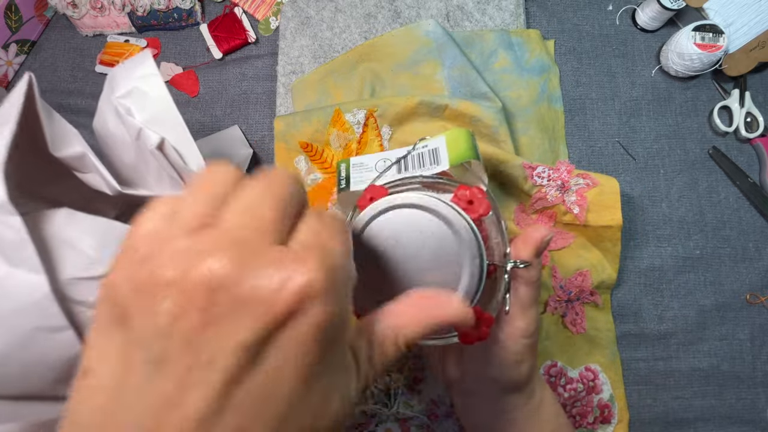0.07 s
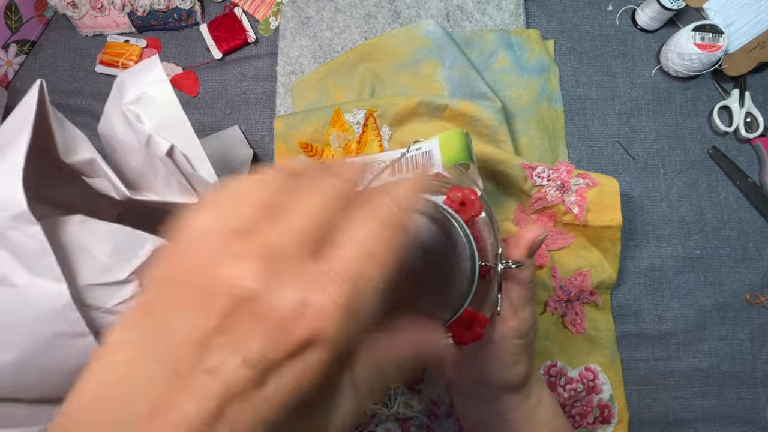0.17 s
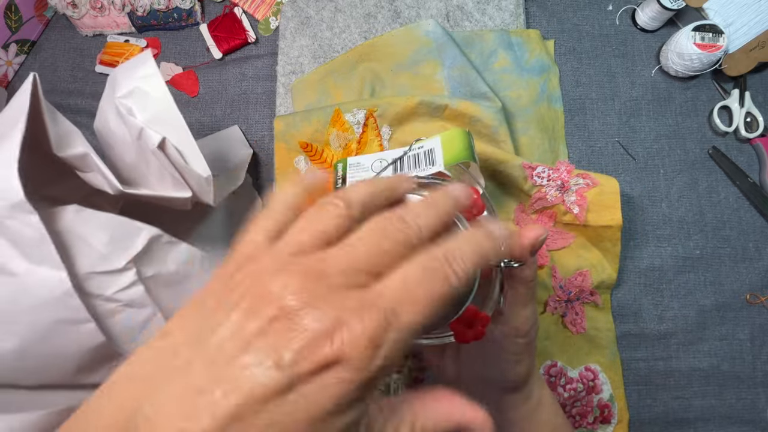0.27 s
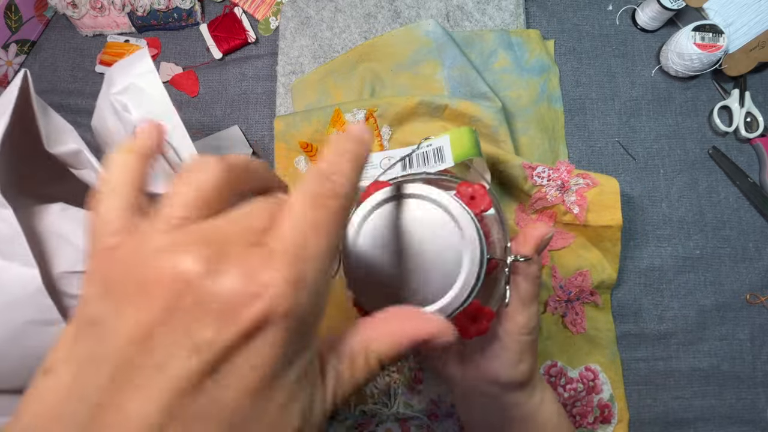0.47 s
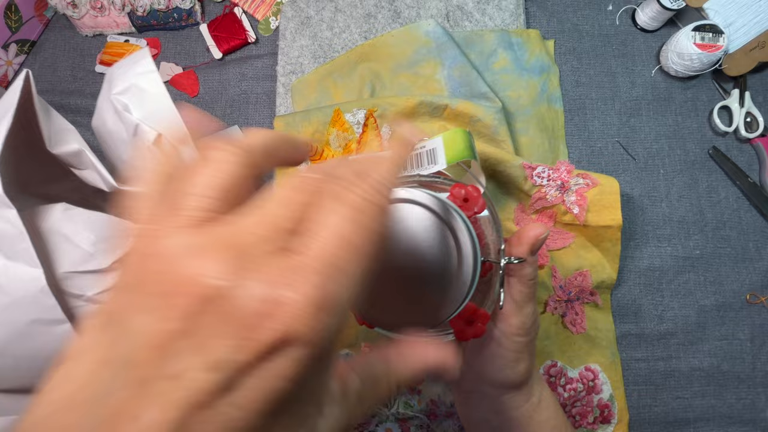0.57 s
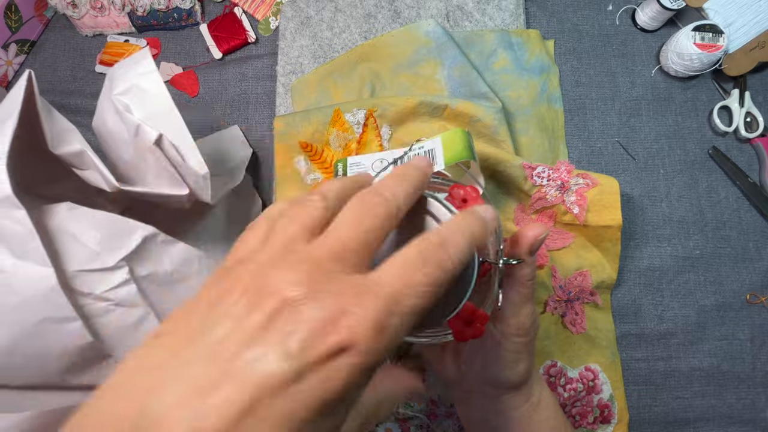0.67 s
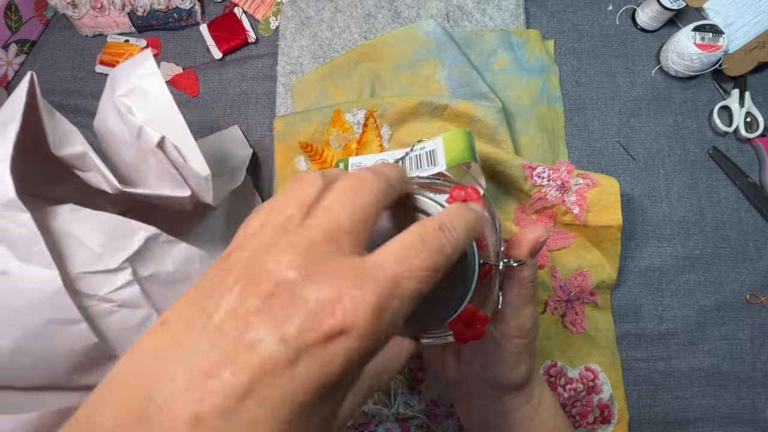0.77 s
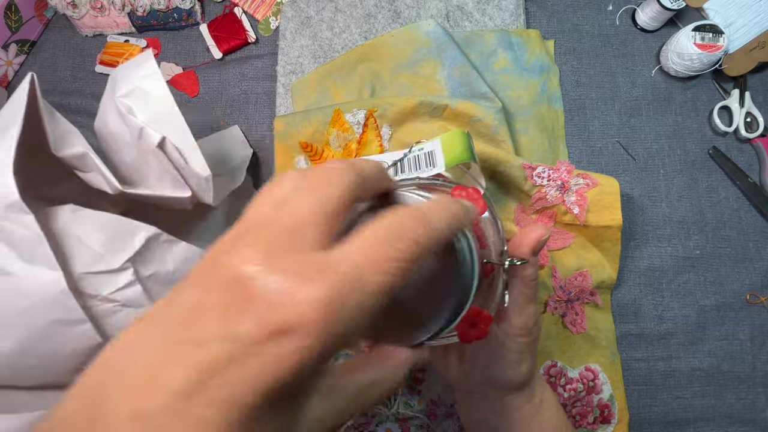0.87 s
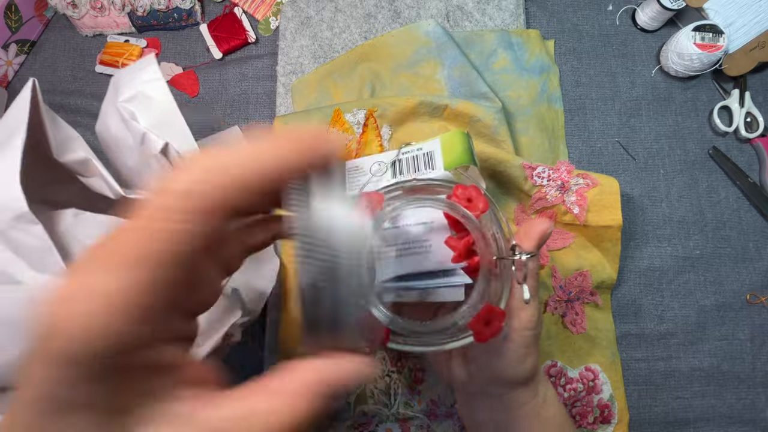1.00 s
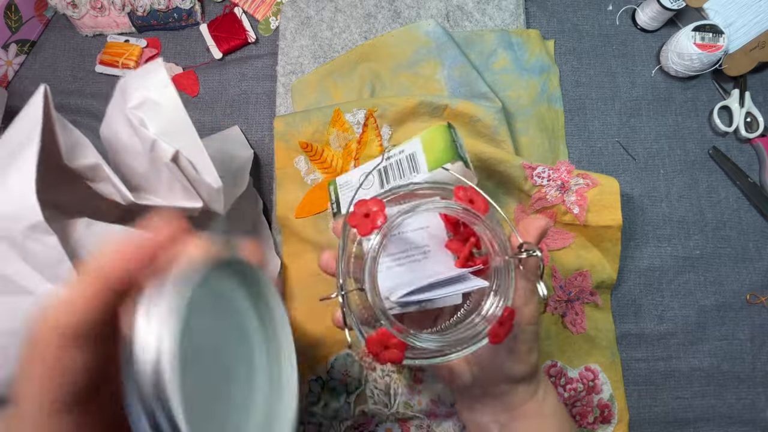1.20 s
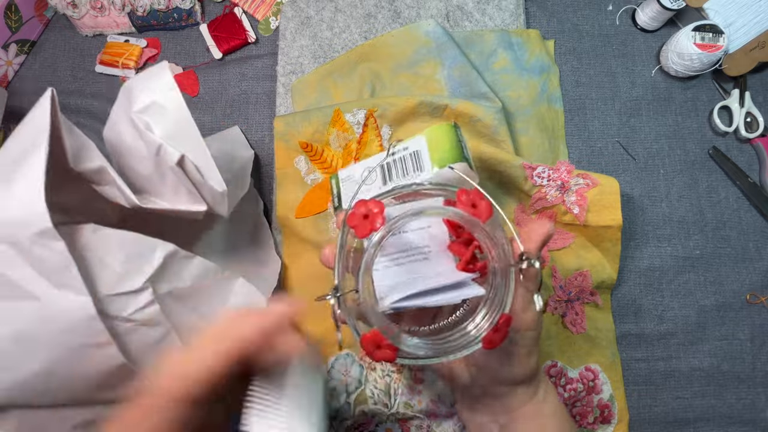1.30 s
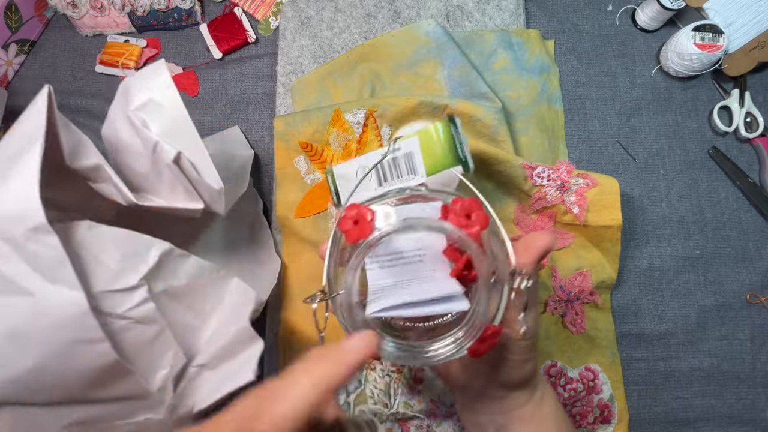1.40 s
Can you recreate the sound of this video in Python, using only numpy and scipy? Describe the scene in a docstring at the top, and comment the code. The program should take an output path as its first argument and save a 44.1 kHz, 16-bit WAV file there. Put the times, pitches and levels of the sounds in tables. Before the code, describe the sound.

A metal screw lid scrapes off a glass jar, followed by a soft brush of cloth.

```python
"""A metal screw lid is twisted off a hand-held glass jar, close up in a quiet room.
Fingers take hold with soft thumps. From about 0.25 s the thread grinds over the glass in tiny slips:
lid and glass ring, the lid squeals where it binds and chatters over the jar's hollow.
The thread jumps with three clacks, the loudest at 0.6 s, and the freed lid pings on the lip.
Last, the arm carries it away with a brush of cloth that snags a few times around 1.35 s."""
import sys
import numpy as np
from scipy import signal
from scipy.fft import rfft, irfft, next_fast_len
from scipy.io import wavfile
from scipy.ndimage import map_coordinates

SR = 44100
rng = np.random.default_rng(int(sys.argv[2]) if len(sys.argv) > 2 else 0)


def int16_out(signal):
    """Quantize to a 16-bit WAV file."""
    q = np.round(np.clip(np.atleast_2d(signal).T, -1, 1) * 32767)
    wavfile.write(sys.argv[1], SR, q.astype(np.int16))


N = 63945

# contacts of fingers, lid and jar: t/s, thump level/dB, thump f/Hz, click level/dB
CONTACTS = [(.001, -47.5, 580, -55), (0.027, -46.5, 350, -57.5), (0.0581, -42.5, 407, -54.5),
            (0.135, -44, 340, -54), (0.2335, -41.5, 364, -31.5), (0.2416, -28, 389, -32),
            (0.267, -34, 390, -34), (0.282, -31.5, 377, -55), (0.2876, -27.5, 358, -53),
            (0.2979, -24, 432, -25.5), (.319, -28.5, 336, -63), (.358, -31.5, 394, -55),
            (.389, -27.5, 355, -36), (.403, -33.5, 450, -45), (.418, -34.5, 305, -36),
            (0.4433, -39, 395, -20), (0.4499, -27.5, 400, -19.5), (0.466, -29, 378, -25),
            (0.553, -33, 461, -36), (.588, -32, 430, -34), (0.5997, -29.5, 439, -17.5),
            (0.6242, -30.5, 487, -26.5), (.665, -33, 410, -38.5), (0.7191, -31.5, 366, -34.5),
            (0.7302, -45, 400, -45), (0.746, -41, 399, -41), (0.781, -44, 500, -44), (1.4, -52, 544, -73)]
SNAG_RISE_S, SNAG_T60_S = 0.0028, 0.059


def lid():
    """Grinding slips and hard clicks rasp, light clicks tap; all of them set lid and glass ringing."""
    # grind of the thread, following the speed of the twist: t/s, level/dB
    twist = [(.225, -93), (.238, -49), (.26, -68), (.276, -46.5), (.288, -39), (.305, -34.5), (.345, -40),
             (.365, -34), (.392, -29.5), (.428, -28.5), (.44, -39), (.475, -32.5), (.5, -33.5), (.555, -37),
             (.582, -44.5), (.635, -44.5), (.66, -60.5), (.705, -68)]
    # rasp of metal on glass: f/Hz, level/dB
    rasp_colour = [(60, -26), (140, -4.5), (400, 4.5), (800, -0.5), (1200, -2.5), (2300, -1.5), (4400, -1),
                   (5800, 3), (8000, -2), (9500, -2), (11300, 5), (12600, -1.5), (14500, -2), (16000, -16)]
    # duller tap of the lid's edge: f/Hz, level/dB
    tap_colour = [(300, -20), (1000, 4), (2500, -4.5), (3300, 0), (4900, 6), (6500, -2), (8200, -31),
                  (10500, 2), (15000, -26)]
    hard_above_db, hard_range_db, click_trim_db = -32, 11.5, -5  # louder clicks turn brighter
    twist_db, = curves(twist)
    grind = patchy(grit() * amp(twist_db + 1.13 * wobble(160.8)))
    hard, light = np.zeros(N), np.zeros(N)
    for start, _, _, db in CONTACTS:
        click = amp(db + click_trim_db) * envelope(start, rise=0.001, t60=0.031)
        hardness = 1 / (1 + np.exp((hard_above_db - db) / hard_range_db))
        hard += hardness * click
        light += (1 - hardness) * click
    force = grind + hard * grit()
    ring = amp(-5) * ringing(force + light * grit())
    rasp = amp(-0.5) * coloured(force, rasp_colour)
    taps = coloured(light * grit(), tap_colour)
    return rasp + ring + taps


def patchy(grind):
    """The colour shifts in random patches as the contact travels round the rim."""
    patch_hz, patch_s, depth_db = 453.4, 0.02, 3
    hz, t, spectrum = signal.stft(grind, SR, nperseg=512)
    knots = rng.standard_normal((256, 256))
    grid = np.meshgrid(hz / patch_hz, t / patch_s, indexing="ij")
    gain = unit(amp(depth_db * map_coordinates(knots, grid, mode="wrap")))
    return signal.istft(spectrum * gain, SR, nperseg=512)[1][:, :N]


def ringing(force):
    """Each mode of lid and glass swells and fades on its own as the contact travels round the rim."""
    # modes of lid and glass: f/Hz, width/Hz, level/dB
    modes = [(1910, 41.5, -4), (2604, 86, -10.5), (3370, 130, -10.5), (4030, 15.5, -3), (4130, 22, -5),
             (4640, 41, -1), (4797, 130, -10.5), (6390, 25, -5), (9150, 290, -8), (10330, 100, -10.5)]
    power = np.array([width * amp(db) ** 2 for _, width, db in modes])
    ring = np.zeros((3, N))
    for mode, share in zip(modes, power / power.sum()):
        coupling = unit(amp(3.5 * wobble(28)))
        ring += np.sqrt(share) * resonate(force * coupling, [mode])
    return np.array([flexed(row) for row in ring])


def flexed(ring, depth_s=0.00007):
    """The grip flexes the lid: a drifting delay makes its notes waver."""
    return map_coordinates(ring, [np.arange(N) + depth_s * SR * wobble(35)], order=5)


def squeal():
    """Where the thread binds, the lid's face rings on for a moment."""
    # tight spots in the thread: t/s, level/dB
    binds = [(0, -55.5), (0.234, -44), (0.274, -40), (.295, -32.5), (.4, -42), (.52, -39), (.72, -53),
             (0.743, -49.5)]
    # modes of the lid's face: f/Hz, width/Hz, level/dB
    face_modes = [(1911, 33, 1.5), (3446, 63, -10)]
    strength = sum(amp(db) * envelope(start, rise=0.005, t60=0.11) for start, db in binds)
    return strength * resonate(grit(), face_modes)


def chatter():
    """The lid chatters over the jar's hollow; so small a jar radiates little bass."""
    # chatter of the lid pressed on the glass: t/s, level/dB
    press = [(0, -54.5), (.035, -57), (.09, -72), (.222, -88), (.24, -39), (.26, -44.5), (.3, -41),
             (.345, -44), (.385, -57), (.45, -37.5), (.53, -41.5), (.58, -40.5), (.615, -34), (.655, -53.5),
             (.705, -56.5), (.752, -46.5), (.8, -56.5), (.88, -68)]
    # modes of the hollow and the lid over it: f/Hz, width/Hz, level/dB
    hollow_modes = [(130, 8.5, -7.5), (217, 25, -7), (319.6, 17, -6.5), (351, 19, -8.5), (386.5, 51, -3),
                    (499, 37, -2), (635, 25.5, -3), (689, 28, -4.5), (945, 150, -13)]
    trim_db, flutter_db = -3, 4.5
    press_db, = curves(press)
    force = grit() * amp(press_db + trim_db + flutter_db * wobble(120))
    low_cut = signal.butter(2, 180, "highpass", fs=SR, output="sos")
    return signal.sosfilt(low_cut, resonate(force, hollow_modes))


def clacks():
    """The thread jumps and the whole rim strikes the glass."""
    # jumps of the thread: t/s, level/dB
    jumps = [(.449, -42), (.599, -27.5), (0.624, -37)]
    # modes of the struck rim: f/Hz, width/Hz, level/dB
    rim_modes = [(344, 42, -0.5), (683, 61, -1), (1003, 42, -3.5), (1160, 73, -11), (2090, 50, -12),
                 (2645, 63, -1), (4580, 380, -6)]
    strength = sum(amp(db) * envelope(start, rise=0.0018, t60=0.035) for start, db in jumps)
    return resonate(strength * grit(), rim_modes)


def thumps():
    """Every contact thumps the hand-damped jar; soft bumps and clinks ring longer."""
    # soft bumps and clinks, one note each: t/s, level/dB, f/Hz
    bumps = [(0.554, -48, 103.4), (0.673, -53, 131), (.988, -52.5, 517), (1.085, -57, 510),
             (1.168, -61.5, 130), (1.368, -54.5, 519), (1.402, -54, 223)]
    knocks = sum(damped_note(start, db, hz, rise=0.0027, t60=0.027) for start, db, hz, _ in CONTACTS)
    return knocks + sum(damped_note(*bump, rise=0.0039, t60=0.15) for bump in bumps)


def pings():
    """The freed lid touches the lip of the jar, each time on another note."""
    # touches on the lip: t/s, level/dB, f/Hz
    touches = [(.719, -47.5, 4180), (.748, -48, 4740), (.7805, -50, 3265), (.783, -50, 4860)]
    return sum(damped_note(*touch, rise=0.00099, t60=0.041) for touch in touches)


def cloth():
    """The arm brushes over fabric, an airy hiss on a grainy body, and catches a few times."""
    # brush stroke: t/s, hiss level/dB, body level/dB
    brush = [(0, -70, -57), (.1, -69, -78), (.2, -67.5, -69.5), (.8, -78, -59.5), (.86, -66.5, -67),
             (.934, -55, -60), (.98, -53, -62), (.995, -48.5, -50.5), (1.025, -51.5, -62.5),
             (1.145, -55, -60), (1.175, -60, -55), (1.2, -53.5, -58), (1.31, -51, -55), (1.385, -56.5, -53),
             (1.41, -99, -69), (1.445, -85, -112)]
    # airy top of the fabric: f/Hz, level/dB
    hiss_colour = [(2000, -13), (4500, -2.5), (6500, -5.5), (8000, -7.5), (9800, -1.5), (12800, -5),
                   (15500, -6)]
    # midrange rub of the fabric: f/Hz, level/dB
    body_colour = [(60, -6), (140, -1.5), (330, 1.5), (520, 6), (750, 6.5), (1100, 4), (1600, 6.5),
                   (2800, 1), (4300, -2), (7000, -5), (14000, -17)]
    # catches of the cloth: t/s, level/dB, starting f/Hz
    snags = [(1.302, -54.5, 3420), (1.329, -44, 3700), (1.364, -44.5, 1500), (1.383, -58.5, 2580),
             (1.398, -53.5, 1000)]
    hiss_db, body_db = curves(brush)
    flares = sum(amp(db - 5) * envelope(start, SNAG_RISE_S, SNAG_T60_S) for start, db, _ in snags)
    hiss = coloured(rng.standard_normal((3, N)) * (amp(hiss_db) + flares), hiss_colour)
    body = coloured(grit() * amp(body_db + 0.88 * wobble(54.9)), body_colour)
    return hiss + body + sum(snag(*row) for row in snags)


def snag(start, db, start_hz):
    """A burst of rubbing whose band of noise sweeps down as the fabric lets go."""
    fall_s, end_ratio, width_oct = 0.0058, 0.18, 0.8
    hz, t, spectrum = signal.stft(grit(), SR, nperseg=256, noverlap=224)
    glide = np.exp(-np.maximum(t - start, 0) / fall_s)
    centre_hz = start_hz * (end_ratio + (1 - end_ratio) * glide)
    band = np.exp(-0.5 * (np.log2((hz[:, None] + 1) / centre_hz) / width_oct) ** 2)
    band /= np.sqrt(np.mean(band ** 2, axis=0))
    rub = signal.istft(spectrum * band, SR, nperseg=256, noverlap=224)[1][:, :N]
    return amp(db) * envelope(start, SNAG_RISE_S, SNAG_T60_S) * rub


def reverb(x):
    """A short diffuse tail on each side; every frequency dies at its own speed."""
    # decay of the room: f/Hz, T60/s
    decay = [(200, 0.11), (2000, 0.26), (10000, 0.055)]
    hz, t, spectrum = signal.stft(rng.standard_normal((2, SR // 2)), SR, nperseg=128)
    fade = np.exp(-np.log(1000) * t / along(decay, hz)[:, None])
    tail = signal.istft(spectrum * fade, SR, nperseg=128)[1]
    tail /= np.linalg.norm(tail, axis=1, keepdims=True)
    return signal.fftconvolve(x[None], tail, axes=1)[:, :N]


def room_tone():
    """A faint, steady low bed, nearly alike on both sides."""
    # background noise of the room: f/Hz, level/dB
    bed_colour = [(25, -36), (45, -2), (58, 9), (85, -8.5), (135, -3.5), (250, -13), (500, -14),
                  (1500, -44), (5000, -46), (15000, -46)]
    mid, side = coloured(rng.standard_normal((2, N)), bed_colour)
    return amp(-67.5) * (mid + amp(-7.5) * np.array([side, -side]))


def placed(friction, pan, lead, notes=0):
    """Stereo image: the two sides share the friction partly, the notes wholly; the room answers both."""
    # direct sound common to both sides: f/Hz, share of power
    direct_share = [(100, 0.94), (400, 0.94), (800, 0.63), (2500, 0.57), (6000, 0.65), (8700, 0.13),
                    (11000, 0.83), (15000, 0.87)]
    sides = np.array([[0.5], [-0.5]])
    shared = filtered(friction[0], lambda hz: np.sqrt(along(direct_share, hz))) + notes
    direct = filtered(shared, lambda hz: np.exp(1j * sides * along(lead, hz)))
    scattered = filtered(friction[1:], lambda hz: np.sqrt(1 - along(direct_share, hz)))
    room = amp(-13.5) * reverb(friction[0] + notes)
    return filtered(direct + scattered + room, lambda hz: amp(sides * along(pan, hz)))


def grit(slips_per_s=5000, scatter_db=4):
    """Tiny slips at random moments, rms 1, in three rows: shared, left only, right only."""
    slips = rng.random((3, N)) < slips_per_s / SR
    polarity = rng.choice([-1, 1], (3, N))
    size = amp(scatter_db * np.clip(rng.standard_normal((3, N)), -2, 2))
    return unit(slips * polarity * size)


def envelope(start, rise, t60):
    """Rounded attack and exponential decay, peak 1; times in seconds."""
    age = np.maximum(np.arange(N) / SR - start, 0)
    shape = (1 - np.exp(-(age / rise) ** 2)) * np.exp(-np.log(1000) * age / t60)
    return shape / shape.max()


def damped_note(start, db, hz, rise, t60):
    """One struck sine that dies away."""
    age = np.arange(N) / SR - start
    return amp(db) * envelope(start, rise, t60) * np.sin(2 * np.pi * hz * age)


def resonate(x, modes):
    """x through a bank of resonances of unit power."""
    def response(hz):
        bank = sum(amp(db) * 1j * hz * width / (centre ** 2 - hz ** 2 + 1j * hz * width)
                   for centre, width, db in modes)
        return bank / np.sqrt(np.mean(abs(bank) ** 2))
    return filtered(x, response)


def coloured(x, colour):
    """x through a broad EQ curve of unit power."""
    return filtered(x, lambda hz: unit(amp(along(colour, hz))))


def filtered(x, response):
    """x times a complex response of frequency."""
    size = next_fast_len(N + SR // 2)
    return irfft(rfft(x, size) * response(np.fft.rfftfreq(size, 1 / SR)), size)[..., :N]


def wobble(per_s):
    """A smooth random curve with per_s knots a second."""
    knots = rng.standard_normal(int(N * per_s / SR) + 4)
    return map_coordinates(knots, [np.arange(N) * per_s / SR])


def curves(rows):
    """One automation curve for each column after the time."""
    times, *columns = np.transpose(rows)
    return [np.interp(np.arange(N) / SR, times, column) for column in columns]


def along(points, hz):
    """Interpolate (f/Hz, value) points on a log frequency axis."""
    point_hz, values = np.transpose(points)
    return np.interp(np.log(hz + 1), np.log(point_hz + 1), values)


def amp(db):
    """Decibels to gain."""
    return 10 ** (np.asarray(db) / 20)


def unit(x):
    """Scale to rms 1."""
    return x / np.sqrt(np.mean(x ** 2) + 1e-20)


def scene():
    """The jar up front and the cloth mostly to the left, over room tone."""
    # balance of each source: f/Hz, left minus right/dB
    jar_pan = [(150, 3), (350, 1.5), (650, 8), (1100, 2), (1500, 2), (1900, -6.5), (2600, -2), (4500, 0),
               (8000, -2), (9300, -7.5), (11500, 0.5)]
    cloth_pan = [(200, 5), (1500, 6), (4200, 9.5), (5800, 3.5), (8000, 1.5), (9500, -4), (11500, 0.5)]
    # phase between the sides: f/Hz, lead of the left/rad
    jar_lead = [(50, -0.5), (300, 0.69), (600, 1.25), (1500, 2), (2600, 2.5), (4000, 0.5), (5500, -2.5),
                (8000, -1.5), (10300, -0.8), (12100, -3.5), (15000, -5.5)]
    cloth_lead = [(50, 1), (400, 1.5), (800, 3.2), (2300, 5.57), (3200, 8.23), (10300, 7.5), (12100, 2.3),
                  (15000, 1.4)]
    friction = lid() + squeal() + chatter() + clacks()
    opening = placed(friction, jar_pan, jar_lead, notes=thumps() + pings())
    return opening + placed(cloth(), cloth_pan, cloth_lead) + room_tone()


def record(dry):
    """A brick-wall high cut at 15.9 kHz."""
    return filtered(dry, lambda hz: hz < 15900)


dry = scene()
out = record(dry)
int16_out(out)
```